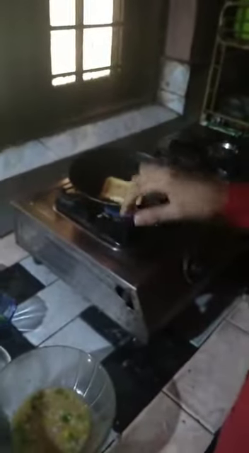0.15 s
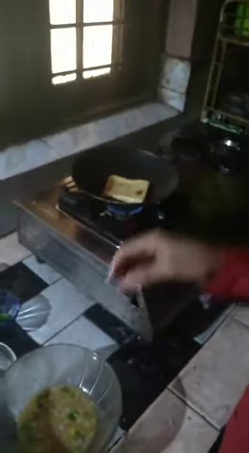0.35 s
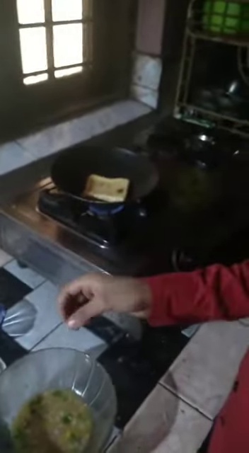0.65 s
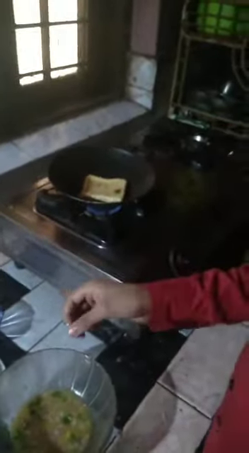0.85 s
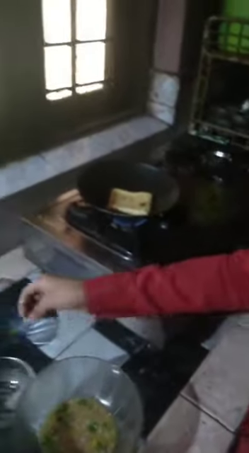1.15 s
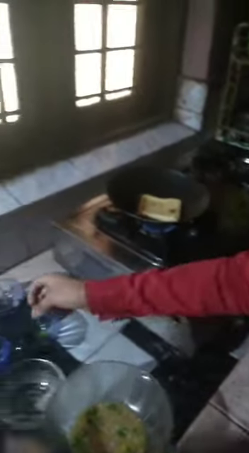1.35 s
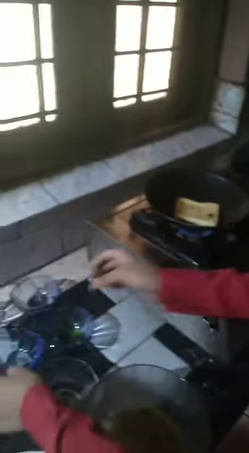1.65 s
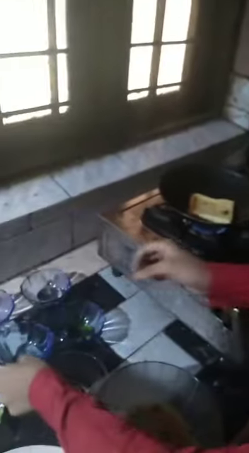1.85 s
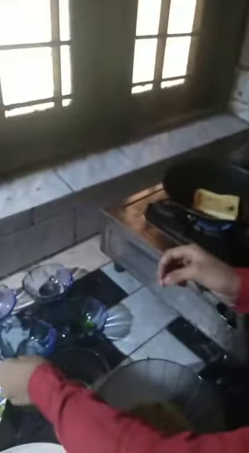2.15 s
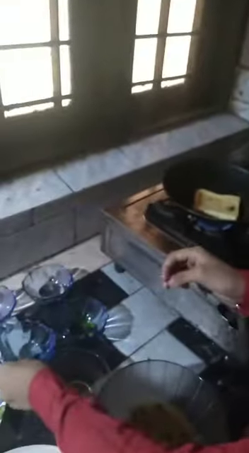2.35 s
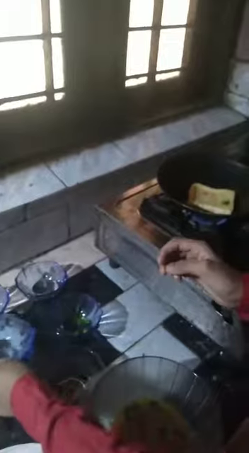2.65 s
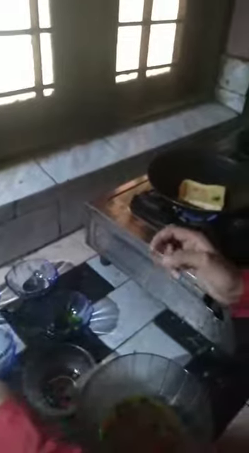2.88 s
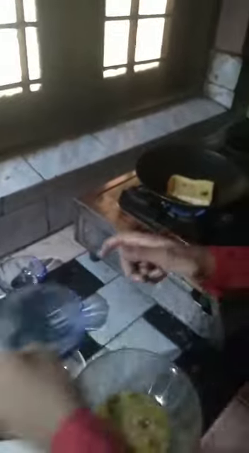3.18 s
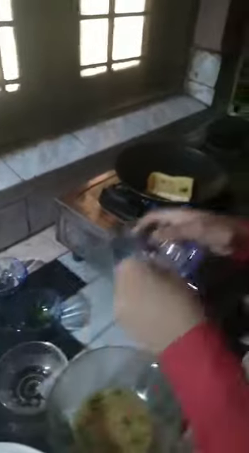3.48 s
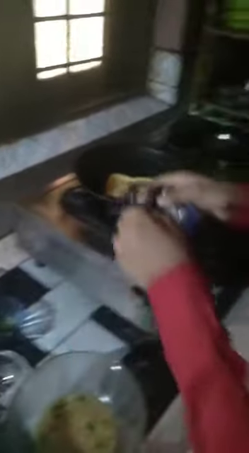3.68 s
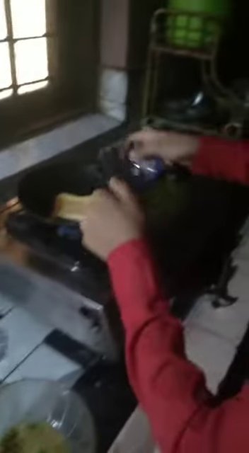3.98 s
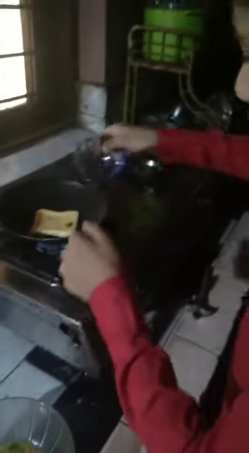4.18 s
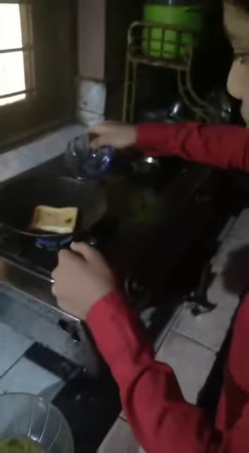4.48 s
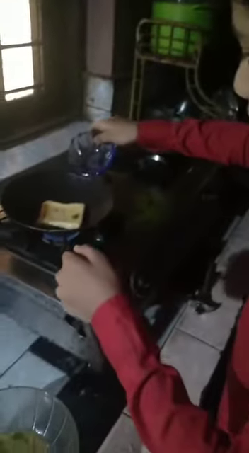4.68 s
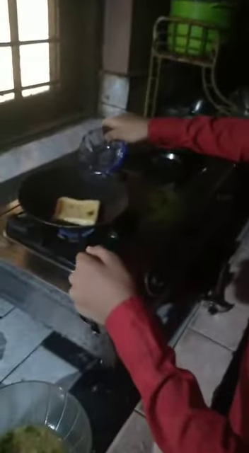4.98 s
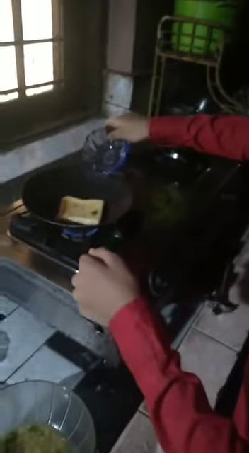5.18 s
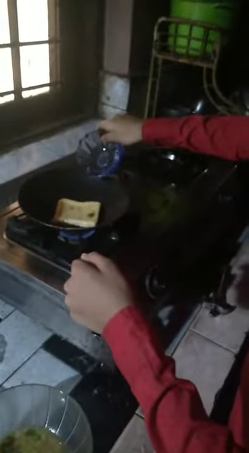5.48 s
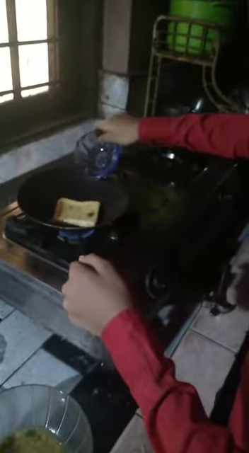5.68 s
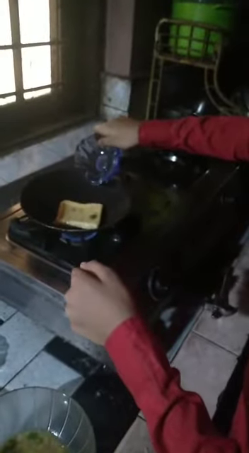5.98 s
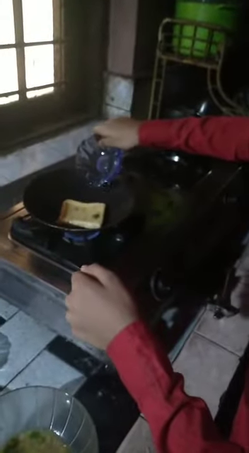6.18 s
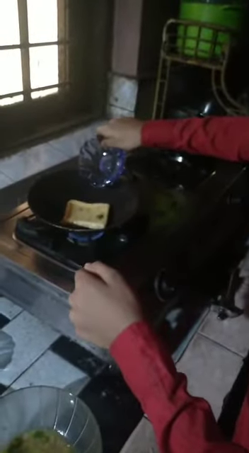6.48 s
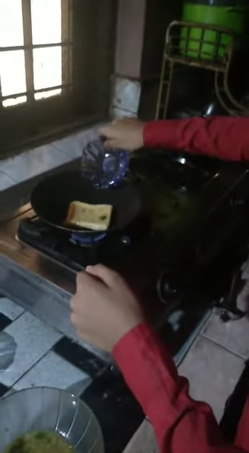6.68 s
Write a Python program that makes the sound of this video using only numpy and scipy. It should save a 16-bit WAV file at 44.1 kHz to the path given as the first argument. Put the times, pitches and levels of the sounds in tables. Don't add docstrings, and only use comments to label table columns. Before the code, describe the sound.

In a small hard kitchen, close to the microphone, a steel spatula knocks, clangs loudly and scrapes on a pan and worktop for just over a second. After a pause, a glass bowl stutters across tile and is lightly clinked at the rim. Later oil glugs very faintly. Outside, a sparrow gives short falling chirps blurred by yard echoes, over deep distant town rumble and slight hiss.

```python
import sys
import numpy as np
from scipy import signal
from scipy.fft import rfft, irfft
from scipy.io import wavfile
from scipy.ndimage import uniform_filter1d

SR = 44100
rng = np.random.default_rng(int(sys.argv[2]) if len(sys.argv) > 2 else 0)


def generate_wav(sig):
    pcm = np.round(np.clip(np.atleast_2d(sig).T, -1, 1) * 32767).astype(np.int16)
    wavfile.write(sys.argv[1], SR, pcm)


def gain_from_decibels(decibels):
    exponent = np.asarray(decibels, float) / 20
    return 10 ** exponent


N = 301644

# frequency in Hz, level in dB per Hz.
SLIDE_GRIT = [(150, -41.5), (250, -34), (404, 3.5), (825, -2), (1050, 3), (1230, 3.5), (1560, 9.5),
              (3600, -17.5), (4680, -44), (7920, -120)]


def rms_one(x):
    return x / np.sqrt(np.mean(x ** 2) + 1e-20)


def at_hz(points, hz):
    table_hz, values = np.array(points).T
    return np.interp(np.log(hz), np.log(table_hz), values)


def colour(x, spectrum):
    hz = np.fft.rfftfreq(len(x), 1 / SR) + 1
    return rms_one(irfft(rfft(x) * gain_from_decibels(at_hz(spectrum, hz)), len(x)))


def causal_colour(burst, gain_db):
    own = uniform_filter1d(np.abs(rfft(burst)) ** 2, size=40)
    cepstrum = irfft(np.log(gain_from_decibels(gain_db) / np.sqrt(own)))
    half = len(burst) // 2
    cepstrum[1:half] *= 2
    cepstrum[half + 1:] = 0
    return irfft(rfft(burst) * np.exp(rfft(cepstrum)))


def band(x, low_hz, high_hz):
    sos = signal.butter(2, [low_hz, high_hz], "band", fs=SR, output="sos")
    return signal.sosfilt(sos, x + 1e-18)


def resonate(x, hz, width_hz):
    r = np.exp(-np.pi * width_hz / SR)
    poles = [1, -2 * r * np.cos(2 * np.pi * hz / SR), r * r]
    return signal.lfilter([(1 - r * r) / 2, 0, (r * r - 1) / 2], poles, x)


def ring(clicks, hz, t60):
    r = gain_from_decibels(-60 / (t60 * SR))
    w = 2 * np.pi * hz / SR
    return signal.lfilter([0, np.sin(w)], [1, -2 * r * np.cos(w), r * r], clicks + 1e-18)


def clicks_at(seconds, db):
    out = np.zeros(N)
    out[np.round(np.asarray(seconds) * SR).astype(int)] = gain_from_decibels(db)
    return out


def grains(per_s, spread_db):
    sizes = gain_from_decibels(spread_db * np.minimum(rng.exponential(1, N), 4))
    signs = rng.choice([-1, 1], N)
    return sizes * signs * (rng.random(N) < per_s / SR)


def drift(per_s, count):
    step = SR / per_s
    points = int(count / step) + 2
    return np.interp(np.arange(count) / step, np.arange(points), rng.standard_normal(points))


def stroke(rows, column=None):
    touch_db_per_s, lift_db_per_s = 2500, 1200
    out, t = np.zeros(N), np.arange(N) / SR
    for row in rows:
        start, end, first_db, last_db = row[:4]
        db = np.interp(t, [start, end], [first_db, last_db])
        db = db - touch_db_per_s * np.maximum(start - t, 0)
        db = db - lift_db_per_s * np.maximum(t - end, 0)
        extra_db = row[column] if column else 0
        out = np.maximum(out, gain_from_decibels(db + extra_db))
    return uniform_filter1d(out, size=200)


def echoes(t60_table, build_s):
    t = np.arange(SR) / SR
    white = rng.standard_normal((2, SR))
    edges_hz = 80 * 2. ** np.arange(0, 8.1, .5)
    tail = np.zeros(SR)
    for k, (low_hz, high_hz) in enumerate(zip(edges_hz, edges_hz[1:])):
        decay = gain_from_decibels(-60 * t / at_hz(t60_table, 1.2 * low_hz))
        tail += band(white[k % 2], low_hz, high_hz) * decay
    tail = tail * (1 - np.exp(-t / build_s))
    return tail / np.sqrt(np.sum(tail ** 2))


def blows(table, modes, crack, crack_s, damping):
    size = 4096
    t, hz = np.arange(size) / SR, np.fft.rfftfreq(size, 1 / SR) + 1
    swell_and_die = np.sqrt(t / crack_s + 0.84) * np.exp(-t / crack_s)
    chatter = rng.standard_normal((len(table), size)) * swell_and_die
    contact_db = np.maximum(at_hz(crack, hz), -60)
    out, strike = np.zeros(N), np.zeros(N)
    for row, burst in zip(table, chatter):
        s, peak_db, ring_db, thud_db, bright_db = (*row, 0, 0, 0)[:5]
        at = round(s * SR)
        lean = [(500, thud_db), (2700, 0.0012), (8000, bright_db)]
        out[at:at + size] += causal_colour(burst, peak_db + 20.0 + contact_db + at_hz(lean, hz))
        strike[at:at + size] += causal_colour(burst, peak_db + ring_db - 20.5 + 0 * hz)
    for mode_hz, level_db, t60 in modes:
        held_t60 = damping * min(t60, 2200 / mode_hz, .45)
        for split in (.995, 1.005):
            out = out + gain_from_decibels(level_db) * ring(strike, split * mode_hz, held_t60)
    return out


def background():
    # frequency in Hz, level in dB per Hz.
    town_air = [(12, -72.5), (20, -38), (42, -24), (56, -5.5), (81, -1), (98, -1.5), (116, -12),
                (284, -17.5), (375, -21.5), (524, -23), (674, -26), (2720, -34.5), (3130, -35), (4020, -35),
                (15800, -50.5)]
    # frequency in Hz, width in Hz, level in dB.
    rumble = [(73, 7, -59.5), (83, 8, -66.5), (282.1, 14, -78)]
    air_db, hiss_db = -53.5, -82.5
    white = rng.standard_normal((3, N))
    hums = np.zeros(N)
    for hz, width_hz, db in rumble:
        hum = resonate(resonate(white[1], hz, width_hz), hz, 3 * width_hz)
        hums += gain_from_decibels(db) * rms_one(hum)
    air = colour(white[0], town_air)
    lumps = gain_from_decibels(2.5 * drift(8, count=N))
    air = air + band(air, 100, 700) * (lumps - 1)
    return gain_from_decibels(air_db - 1) * air + hums + gain_from_decibels(hiss_db) * white[2]


def chirp(level_db, start_hz):
    hold_s, sag_hz_per_s, end_hz = .0075, 80000, 2080
    attack_s, release_s, fade_db, tire_db = .003, 0.0047, -19.5, -4
    beak_hz, beak_width_hz, beak_db = 4850, 500, 5.5
    length = hold_s + (start_hz - end_hz) / sag_hz_per_s
    t = np.arange(round(length * SR)) / SR
    hz = start_hz - sag_hz_per_s * np.maximum(t - hold_s, 0)
    phase = 2 * np.pi * np.cumsum(hz) / SR
    onset = np.maximum(1 - t / attack_s, 0)
    release = np.maximum(1 - (length - t) / release_s, 0) ** 2
    effort = gain_from_decibels(level_db + tire_db * t / length + fade_db * (onset + release))
    overtone_db = -3 - (level_db + 46.5) + 18 * np.minimum(2.0 * t / length - 1, 0)
    overtone_db = overtone_db + beak_db * np.exp(-((2 * hz - beak_hz) / beak_width_hz) ** 2)
    return effort * (np.sin(phase) + gain_from_decibels(overtone_db) * np.sin(2 * phase))


def sparrow():
    # start in seconds, level in dB, starting pitch in Hz.
    chirps = [(-.04, -43, 3420), (0.932, -39, 4050), (1.678, -37.5, 3790), (2.38, -41, 4340),
              (3.442, -40.5, 3956), (4.022, -40.5, 3445), (4.316, -41.5, 3366), (4.595, -44.5, 3340),
              (4.93, -43.5, 3747), (5.295, -44, 3754), (5.703, -45.5, 3604)]
    # frequency in Hz, time to fall 60 dB in seconds.
    yard_t60 = [(2000, 0.89), (3000, 0.81), (4000, .65), (5500, 0.66), (8000, 0.62)]
    near_wall_db, near_wall_s = -10, 0.14
    lead = SR // 10
    dry = np.zeros(N + lead)
    for s, level_db, start_hz in chirps:
        call = chirp(level_db, start_hz)
        at = round(s * SR) + lead
        dry[at:at + len(call)] += call
    yard = echoes(yard_t60, build_s=.004)
    yard = yard * gain_from_decibels(1.5 * drift(70, count=SR))
    yard = yard * (1 + gain_from_decibels(near_wall_db) * np.exp(-np.arange(SR) / SR / near_wall_s))
    reflected = signal.fftconvolve(dry, yard)[:len(dry)]
    return gain_from_decibels(-2.0) * (gain_from_decibels(-12) * dry + reflected)[lead:]


def spatula_on_edge():
    # start in seconds, peak in dB, ring in dB.
    edge_blows = [
        (0.188, -4, -11.5),
    ]
    # frequency in Hz, level in dB, time to fall 60 dB in seconds.
    edge_steel = [(1100, 1.5, 0.053), (1400, -7, 0.22), (1529, -5.5, 0.35), (1690, -6, 0.8),
                  (2200, -6, 0.18), (2536, -6, 0.18), (3350, -1.5, 0.28), (4300, -10, 0.25),
                  (4710, -9.5, 0.31), (5518, -13.5, 0.078), (7160, -12, 0.43), (7348, -18.5, 0.16),
                  (8204, -21.5, 0.24), (8952, -23, 0.2)]
    # frequency in Hz, level in dB per Hz.
    edge_crack = [(88, -47.5), (150, -22.5), (274, -5), (827, -62), (948, -3.5), (1340, -25.5), (1510, 0),
                  (2140, -15.5), (2270, -5.5), (2700, -11.5), (3280, -4.5), (3760, -11), (4930, -15.5),
                  (15500, -45)]
    return blows(edge_blows, edge_steel, edge_crack, crack_s=0.013, damping=0.24)


def spatula_flat():
    # start in seconds, peak in dB, ring in dB.
    flat_blows = [
        (0.3481, -8.5, -8),
        (0.4204, -34, -8.5),
    ]
    # frequency in Hz, level in dB, time to fall 60 dB in seconds.
    flat_steel = [(958, -5, 0.34), (1475, -3, 0.25), (1830, -13, 5.0), (2360, -8, 0.38), (2600, -22.5, 5.0),
                  (3370, -1, 0.3), (4230, -11.5, 0.19), (4570, -17, 0.25), (4748, -7.5, 0.12),
                  (5270, -19, 0.42), (5642, -27.5, 0.94), (6616, -23, 0.5), (6960, -17.5, 0.32),
                  (7332, -10.5, 0.14)]
    # frequency in Hz, level in dB per Hz.
    flat_crack = [(88, -53.5), (150, -32), (359, -9), (631, -18.5), (966, -9), (1090, -19.5), (1450, -19),
                  (2140, -5.5), (2310, -3), (2920, -13), (3350, 7.5), (3910, -11), (4650, -7.5),
                  (15500, -45)]
    return blows(flat_blows, flat_steel, flat_crack, crack_s=0.0039, damping=0.33)


def spatula_dropped():
    # start in seconds, peak in dB, ring in dB, extra thud in dB, extra brightness in dB.
    drop_blows = [
        (0.484, -52, 9, 8.0, -8),
        (0.496, -30, -29, 23.5, -14.5),
        (0.5186, 6.5, -7, -8.5, -4),
        (0.5226, -2.5, -3.5, -10, -16.5),
        (0.6733, -9.5, -2, -19, -8),
        (0.7747, -34, -3, 26, -3),
    ]
    # frequency in Hz, level in dB, time to fall 60 dB in seconds.
    drop_steel = [(860, -10.5, 0.58), (1489, -10, 0.22), (1900, -4.5, 0.34), (2293, -4, 0.39),
                  (2439, -9.5, 0.28), (2752, -25, 5.0), (3420, -10, 0.91), (4400, -22.5, 0.29),
                  (5146, -17, 0.19), (5940, -13, 0.16), (6891, -18.5, .4), (8140, -23, 0.14),
                  (9022, -27, 0.2), (10100, -30, 0.2)]
    # frequency in Hz, level in dB per Hz.
    drop_crack = [(88, -55), (150, -9.5), (244, -14.5), (600, -23), (985, 0.5), (1240, -13.5), (1500, -7.5),
                  (1910, 4), (2140, -6), (2360, 1.5), (2650, -2.5), (5230, -5.5), (6350, -12.5),
                  (15500, -29)]
    return blows(drop_blows, drop_steel, drop_crack, crack_s=0.0019, damping=0.35)


def spatula_dragged():
    # start in seconds, peak in dB, ring in dB, extra thud in dB, extra brightness in dB.
    drag_blows = [
        (1.0111, -28.5, -16, 23, 1),
        (1.0253, -14, -5, 11.5, -2.5),
        (1.1045, -26.5, 3.5, 19, -6),
        (1.1254, -33.5, -20, -4, 22.5),
        (1.1899, -15.5, -32, -32, 7),
        (1.1985, -9, -8, -26, -35),
    ]
    # start in seconds, peak in dB, ring in dB.
    skid_blows = [
        (1.1675, -36, 33),
        (1.1715, -36, 33),
    ]
    # frequency in Hz, level in dB, time to fall 60 dB in seconds.
    drag_steel = [(1088, -23, 0.39), (2110, -1.5, 0.68), (2290, -6, 0.92), (2560, -8, 0.44),
                  (2840, -1, 5.0), (3250, 9.5, 0.34), (4520, -2, 5.0), (5240, -1, 5.0), (5040, -30, 2.6),
                  (6760, -6, 5.0), (7854, -40, 0.52), (8323, -38, 0.99), (10080, -59, 5.0),
                  (11300, -39, 0.36)]
    skid_steel = [(2020, 0, .014), (3330, 0, .014), (5400, -12, .03), (1050, -14, .03)]
    # frequency in Hz, level in dB per Hz.
    drag_crack = [(88, -25), (150, -31.5), (396, -14), (781, -38), (1020, 0.5), (1240, -29), (1910, 7),
                  (2180, -5), (3220, -10), (3690, 1.5), (5540, -7.5), (14100, -33.5), (15500, -37)]
    knocks = blows(drag_blows, drag_steel, drag_crack, crack_s=0.0068, damping=0.16)
    return knocks + blows(skid_blows, skid_steel, drag_crack, crack_s=0.0019, damping=0.65)


def spatula_scrape():
    # start in seconds, end in seconds, first level in dB, last level in dB, brightness in dB.
    strokes = [
        (.44, .48, -42.5, -52, -2),
        (.48, .514, -37.5, -23, -9),
        (.70, .71, -25, -63, -15),
        (.78, .885, -33.5, -46.5, -5),
        (1.04, 1.135, -30.5, -35.5, 4),
        (1.215, 1.295, -27.5, -32.5, 7),
    ]
    # frequency in Hz, width in Hz, level in dB.
    blade_ring = [(415, 50, -3.5), (943, 65, 2.5), (1870, 120, 7.5), (2350, 38, -4.5), (2689, 60, -9),
                  (3380, 90, 6), (3950, 23, -16), (4350, 51, -4.5), (4740, 31, -9.5), (5080, 19.85, -20),
                  (5370, 160, -10.5), (6950, 41, -14), (7700, 180, -23.5), (8190, 42, -17)]
    # frequency in Hz, level in dB per Hz.
    scrape_grit = [(88, -49.5), (150, -9.5), (420, -5.5), (561, -10.5), (1020, -3.5), (1150, -8),
                   (1910, -4), (2810, -1), (3350, -7), (15500, -59.5)]
    slips = grains(1500, spread_db=3.0)
    rung = np.zeros(N)
    for k, (hz, width_hz, db) in enumerate(blade_ring):
        sign = (-1) ** k
        rung += sign * gain_from_decibels(db) * rms_one(resonate(slips, hz, 1.2 * width_hz))
    grit = colour(slips, scrape_grit)
    treble = band(grit, 5000, 16000)
    body = gain_from_decibels(-10.0) * rms_one(rung) + gain_from_decibels(-9.5) * (grit - treble)
    return stroke(strokes) * body + gain_from_decibels(6) * stroke(strokes, column=4) * treble


def bowl_foot():
    # start in seconds, peak in dB.
    foot_knocks = [
        (2.082, -58),
        (2.164, -47.5),
        (2.278, -52),
        (2.632, -42.5),
    ]
    # start in seconds, end in seconds, first level in dB, last level in dB.
    slides = [
        (2.164, 2.226, -38.5, -36),
        (2.268, 2.295, -46, -45),
        (2.426, 2.6, -50.5, -72),
        (2.634, 2.665, -50, -68),
    ]
    knocks = blows(foot_knocks, [], SLIDE_GRIT, crack_s=0.0018, damping=.2)
    stutter = colour(grains(600, spread_db=0.5), SLIDE_GRIT)
    return knocks + gain_from_decibels(-8.5) * stroke(slides) * stutter


def bowl_clinks():
    # start in seconds, thick bowl in dB, thin bowl in dB.
    clinks = [
        (2.181, -44, -61),
        (2.2103, -28.5, -43),
        (2.546, -76, -46),
        (2.588, -91.5, -51),
        (2.648, -74, -46),
        (2.724, -80, -50.5),
        (2.85, -80.5, -59),
    ]
    # frequency in Hz, level in dB, time to fall 60 dB in seconds.
    thick_glass = [(4300, -6, 0.2), (4470, -29.5, 0.088), (3920, -17, 0.1), (7430, -23.5, 0.087),
                   (4910, -25, 0.048), (3040, -7.5, 0.011), (8400, -28, .04), (11400, -24.5, 0.098)]
    thin_glass = [(3806, -4, 0.047), (3810, -12.5, 0.54), (7693, -23.5, .12)]
    s, thick_db, thin_db = np.transpose(clinks)
    soft = signal.windows.hann(7)
    out = np.zeros(N)
    for touch_db, glass in ((thick_db, thick_glass), (thin_db, thin_glass)):
        touches = np.convolve(clicks_at(s, touch_db), soft)[:N]
        for hz, db, t60 in glass:
            out += gain_from_decibels(db) * ring(touches, hz, t60)
    return gain_from_decibels(-7) * out


def glugs():
    # start in seconds, bubble in dB, thud in dB.
    oil_glugs = [
        (4.7166, -60, -60.5),
        (4.835, -55, -54),
        (5.0266, -58.5, -54.5),
        (5.1413, -60, -56.5),
        (5.459, -63.5, -65),
        (5.5248, -60, -58.5),
        (5.708, -64, -58),
        (5.819, -59, -54.5),
    ]
    s, bubble_db, thud_db = np.transpose(oil_glugs)
    pop, plop = clicks_at(s, bubble_db), clicks_at(s, thud_db + 4.5)
    bubble = ring(pop, 1065, 0.091) + ring(pop, 1206, 0.051)
    thud = ring(plop, 414, 0.046) + ring(plop, 234, 0.096)
    return band(bubble + thud, 110, 1700)


def kitchen_echo(near):
    # frequency in Hz, time to fall 60 dB in seconds.
    kitchen_t60 = [(200, 0.37), (1000, 0.29), (4000, 0.29), (12000, 0.17)]
    room = causal_colour(echoes(kitchen_t60, build_s=0.0031), 0)
    return gain_from_decibels(1.5) * signal.fftconvolve(near, room)[:N]


def scene():
    spatula = spatula_on_edge() + spatula_flat() + spatula_dropped() + spatula_dragged() + spatula_scrape()
    near = spatula + bowl_foot() + bowl_clinks()
    wet = kitchen_echo(near)
    mid = near + wet + glugs() + sparrow() + background()
    late = np.roll(near + wet / gain_from_decibels(1.5), 90)
    side = gain_from_decibels(-8) * band(band(late, 7000, 12000), 6500, 13500)
    return np.array([mid + side, mid - side])


def roll_off(x):
    return signal.sosfilt(signal.butter(12, 16120, fs=SR, output="sos"), x)


def record(dry):
    x = signal.sosfilt(signal.butter(2, 30, "high", fs=SR, output="sos"), dry)
    mid = x.mean(axis=0)
    x = x - mid + 1.25 * np.tanh(mid / 1.25)
    x = signal.sosfilt(signal.cheby2(12, 60, 16500, fs=SR, output="sos"), x)
    return roll_off(x)


dry = scene()
out = record(dry)
generate_wav(out)
```